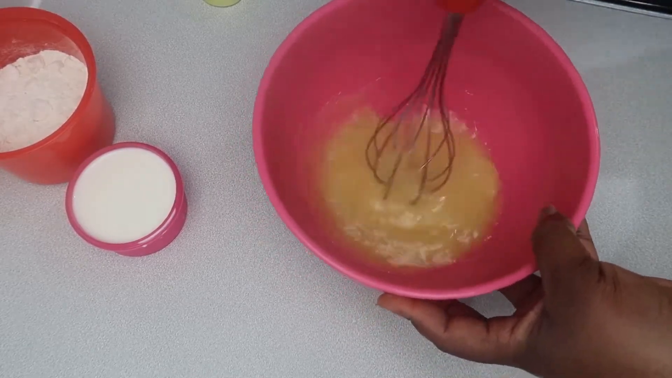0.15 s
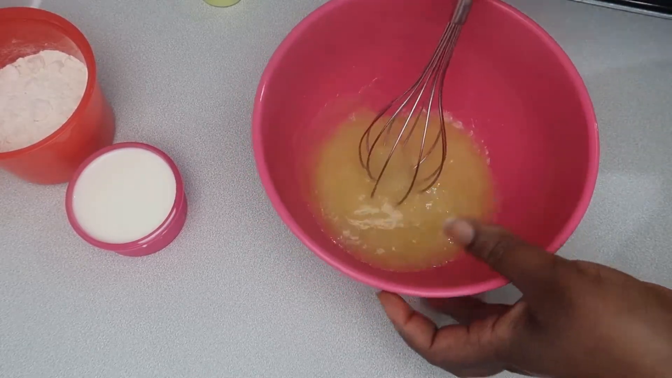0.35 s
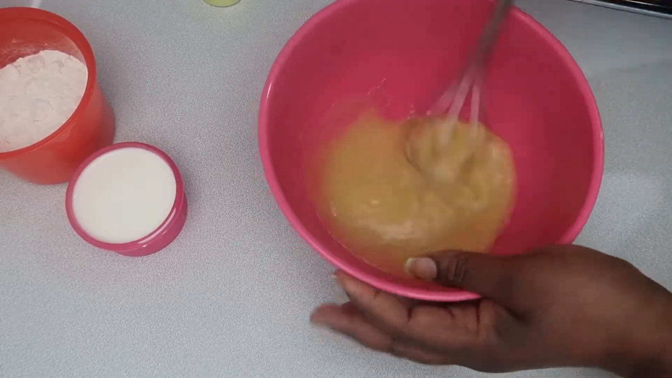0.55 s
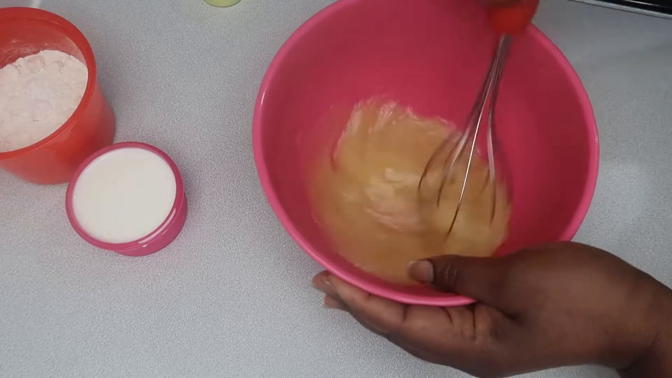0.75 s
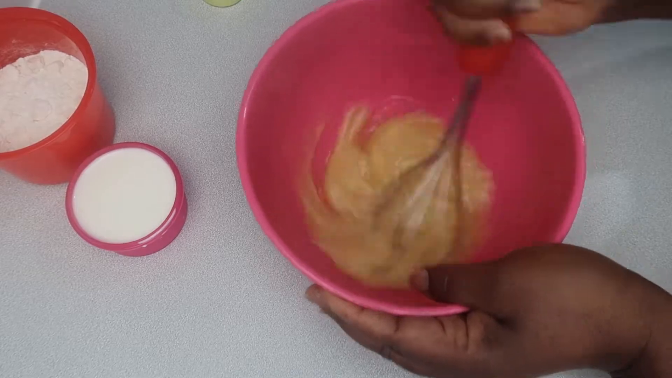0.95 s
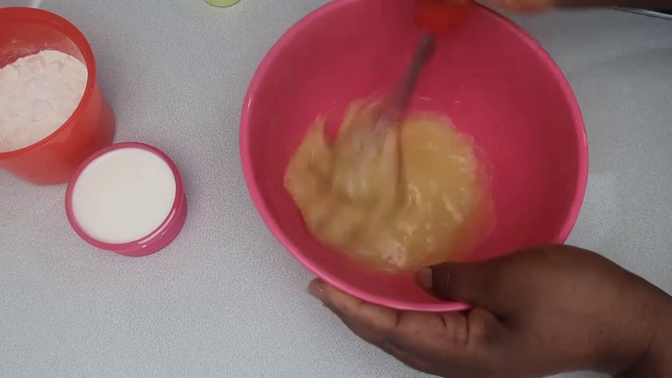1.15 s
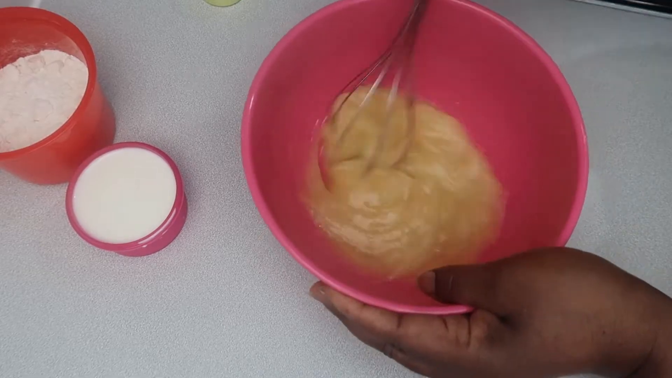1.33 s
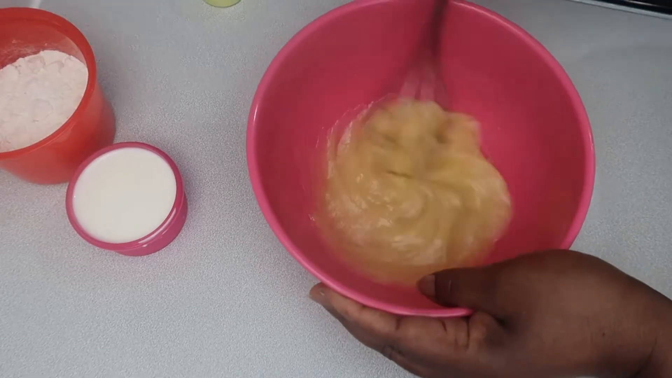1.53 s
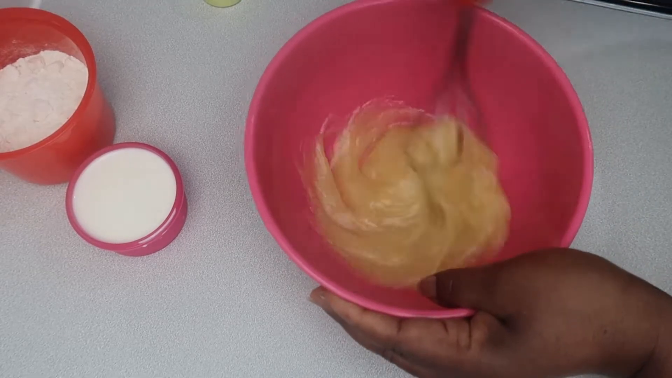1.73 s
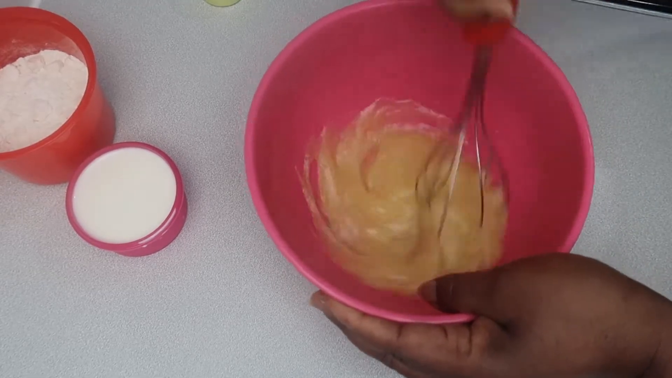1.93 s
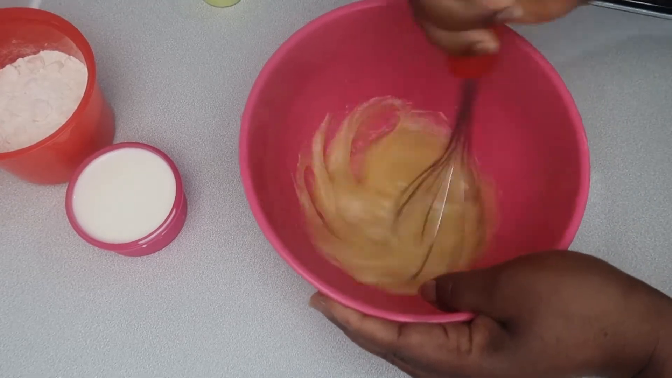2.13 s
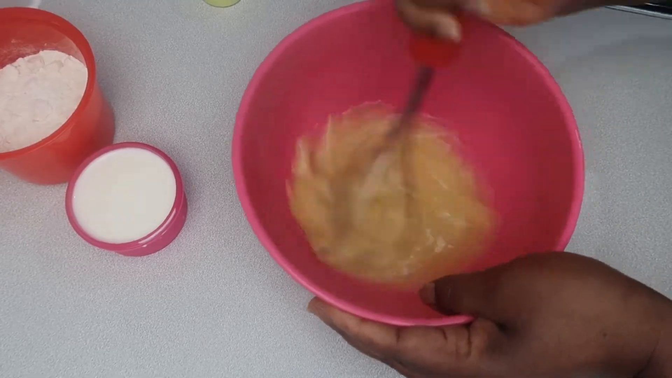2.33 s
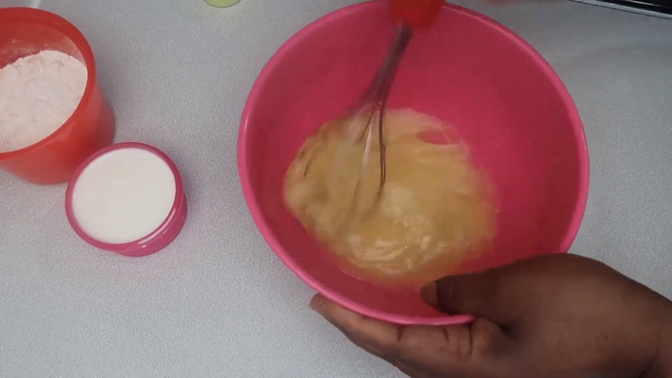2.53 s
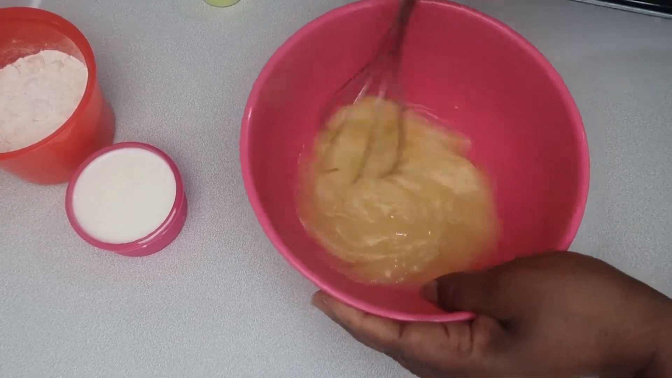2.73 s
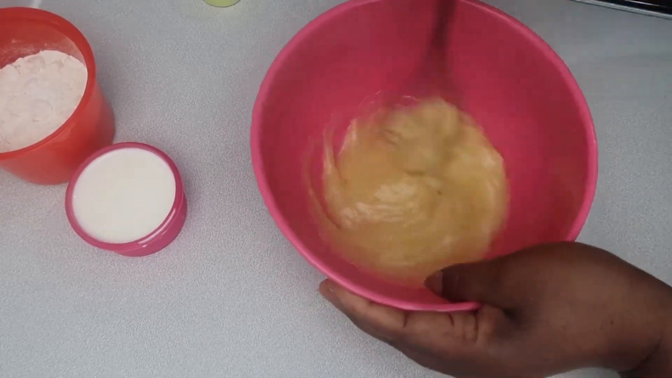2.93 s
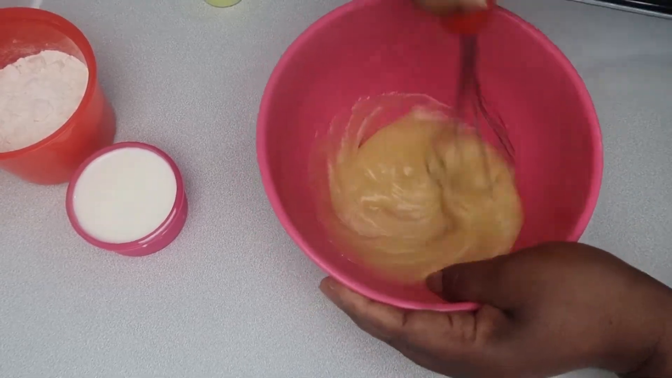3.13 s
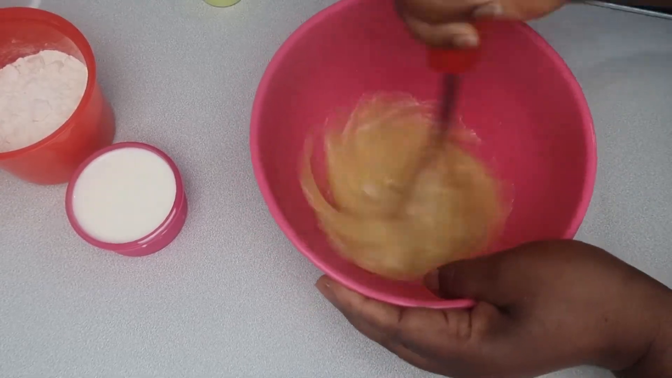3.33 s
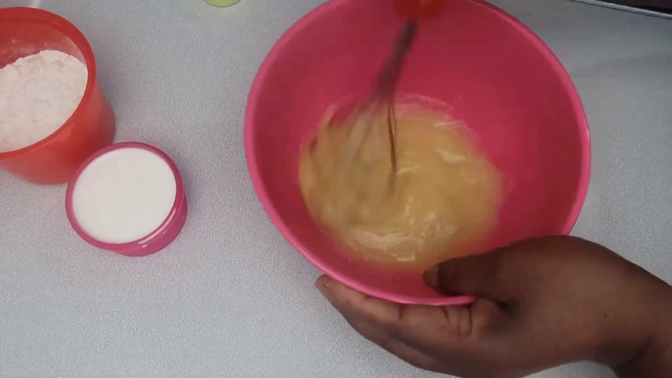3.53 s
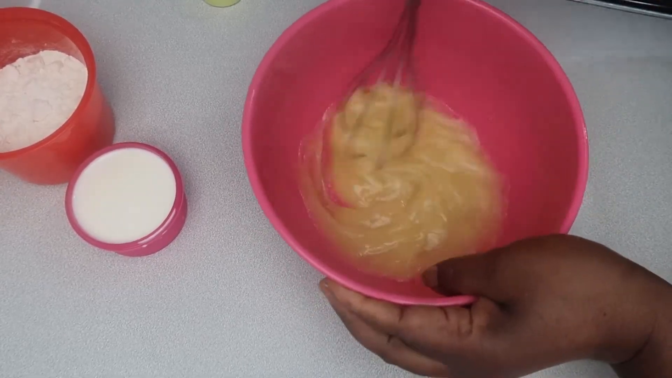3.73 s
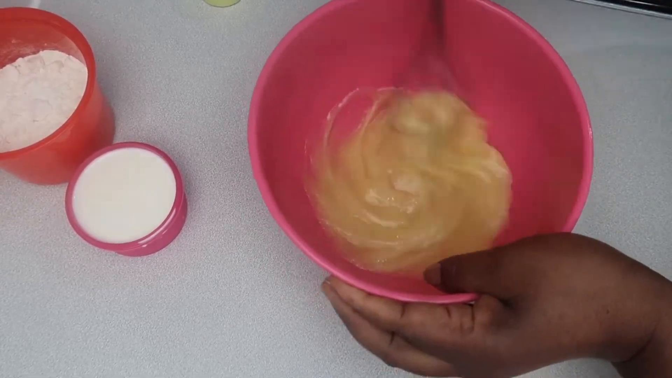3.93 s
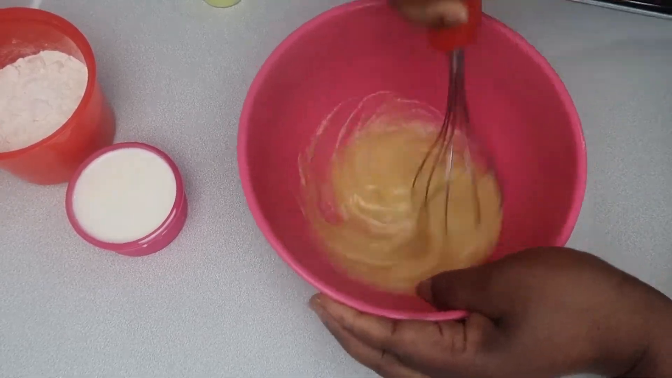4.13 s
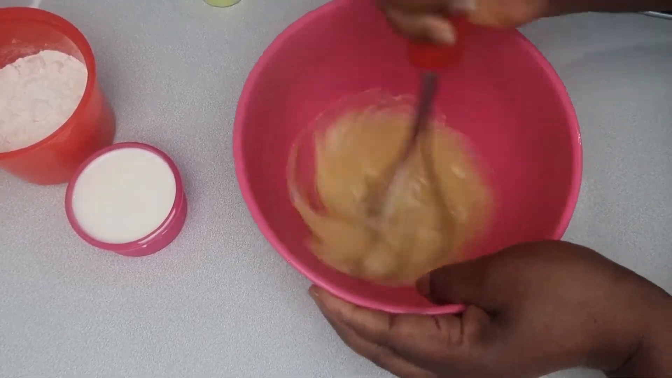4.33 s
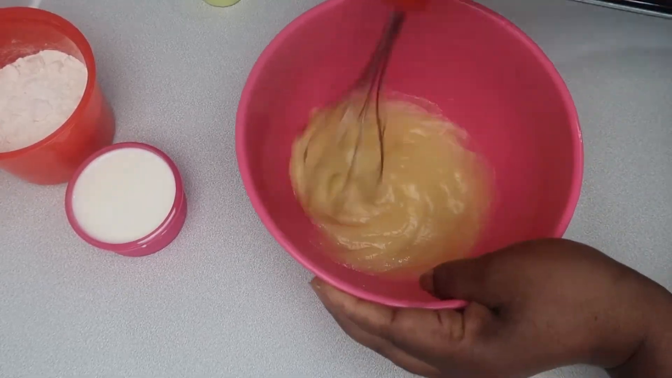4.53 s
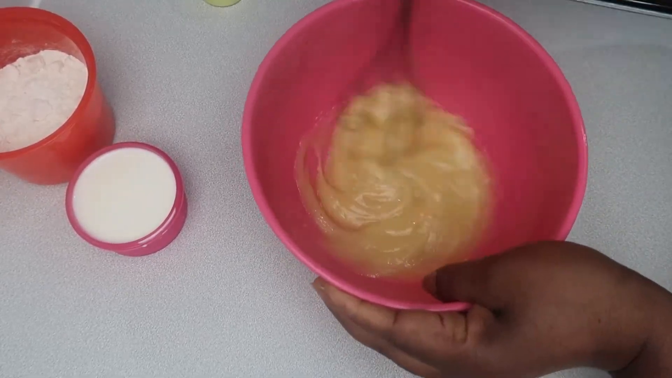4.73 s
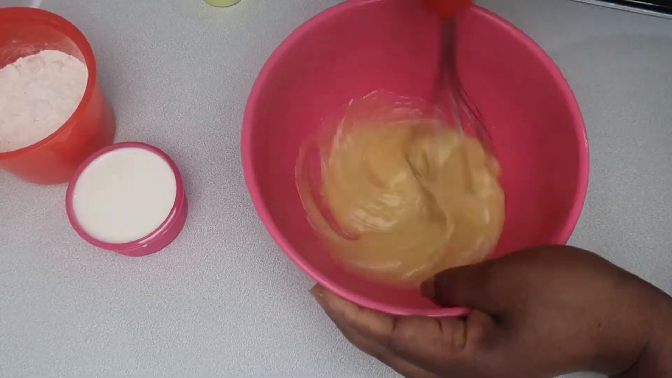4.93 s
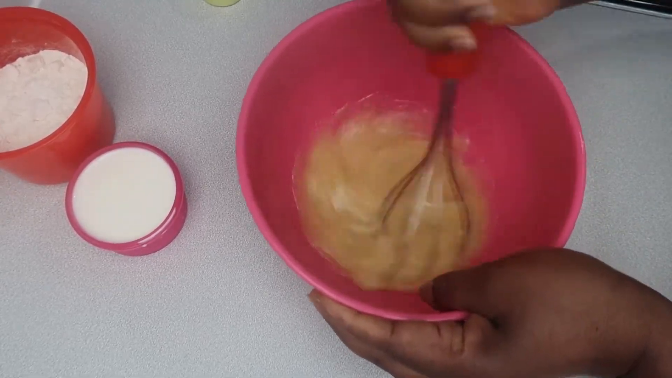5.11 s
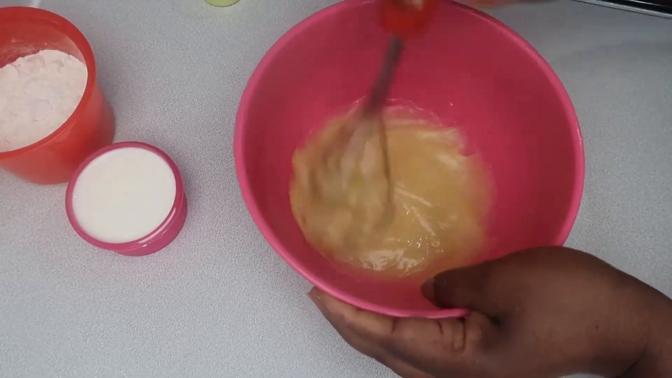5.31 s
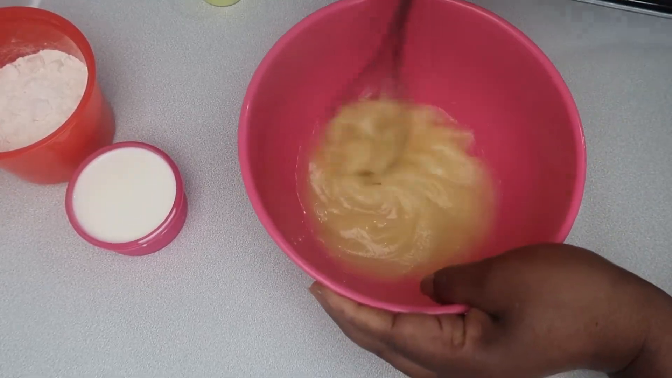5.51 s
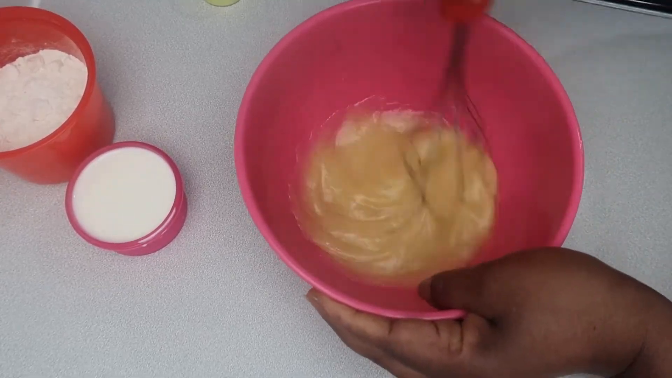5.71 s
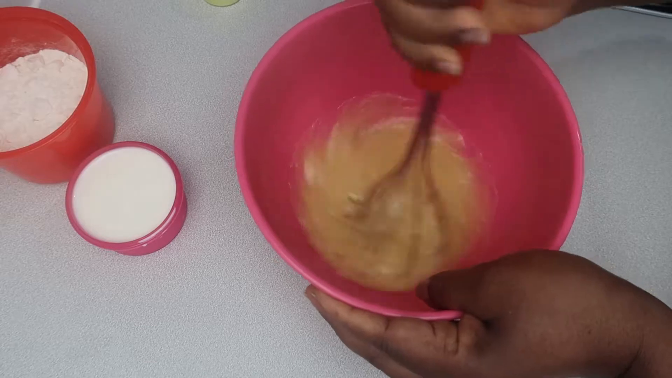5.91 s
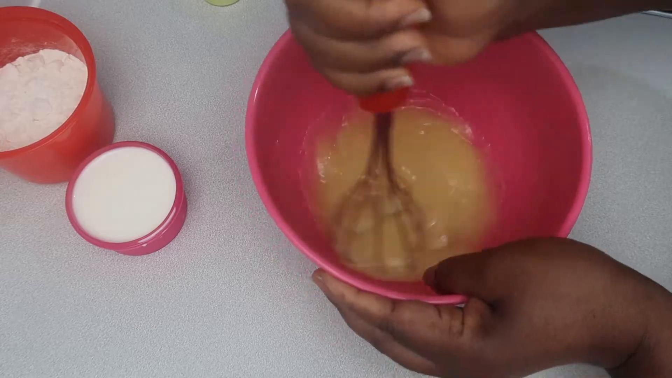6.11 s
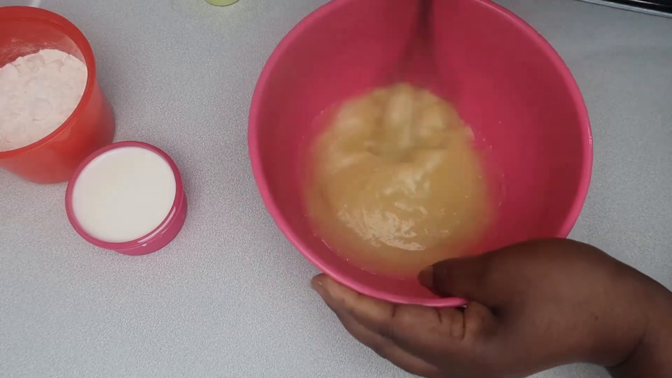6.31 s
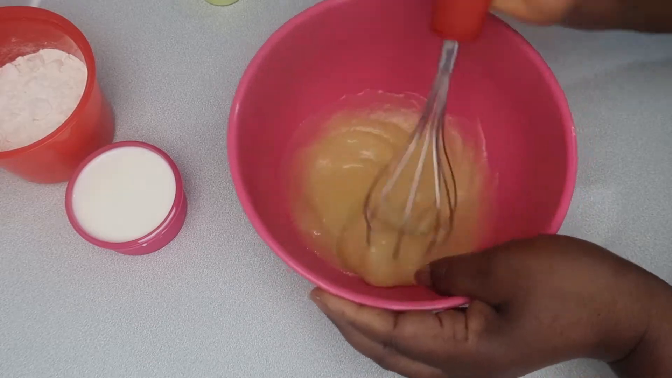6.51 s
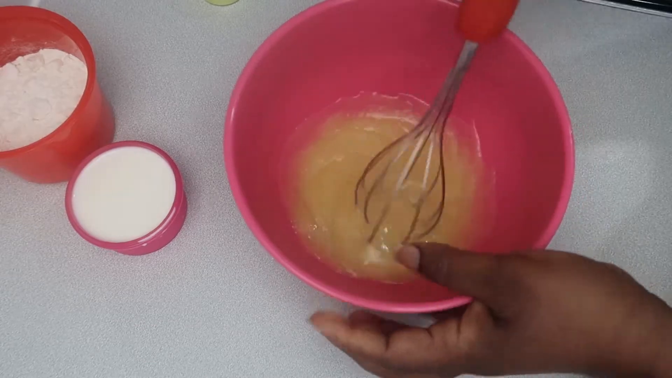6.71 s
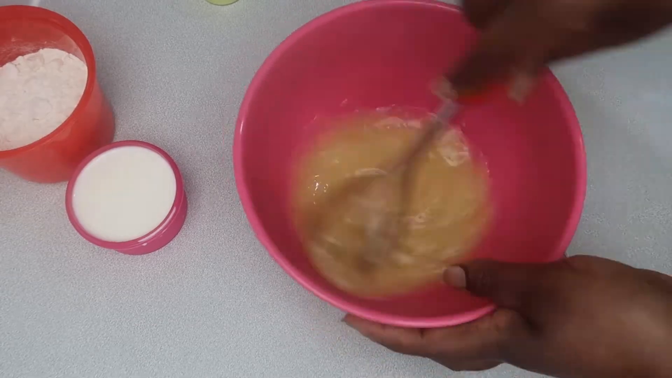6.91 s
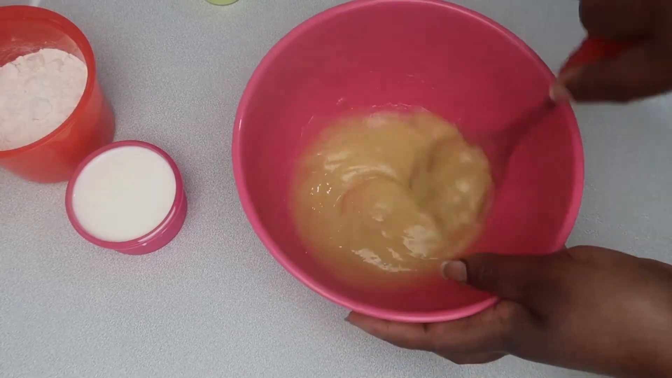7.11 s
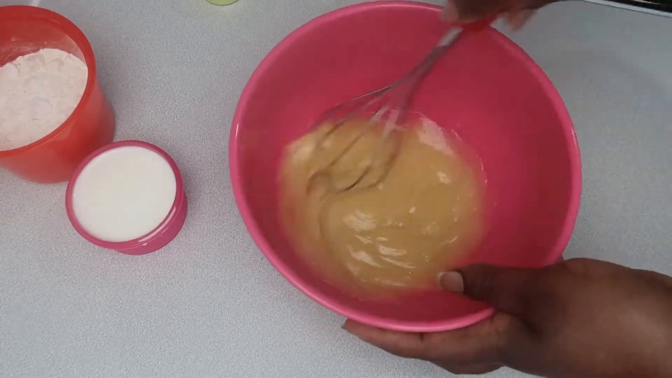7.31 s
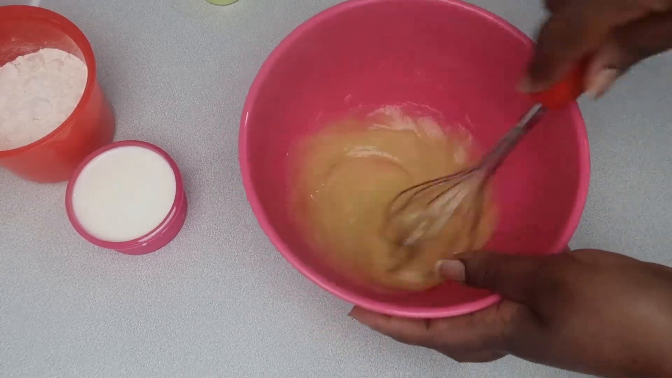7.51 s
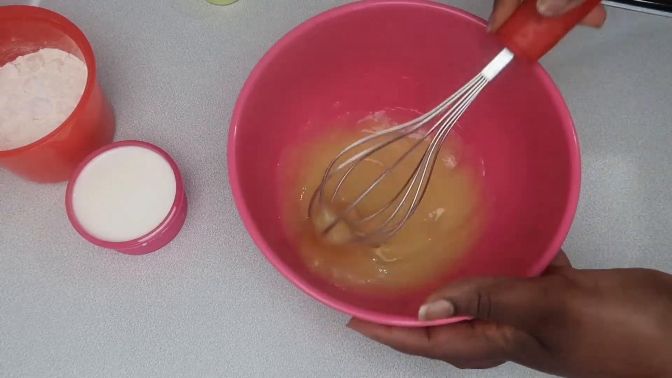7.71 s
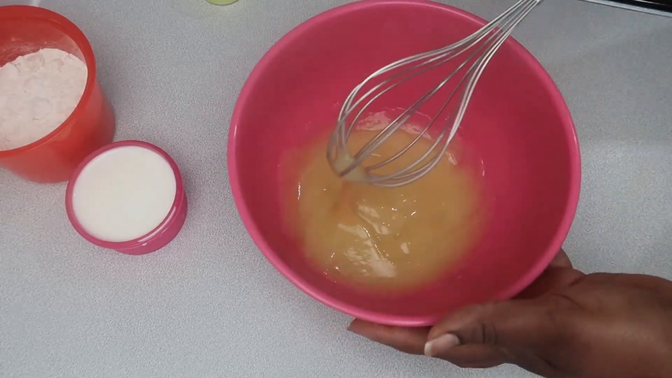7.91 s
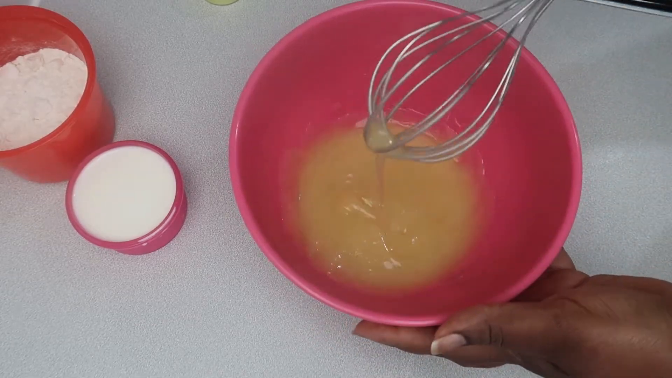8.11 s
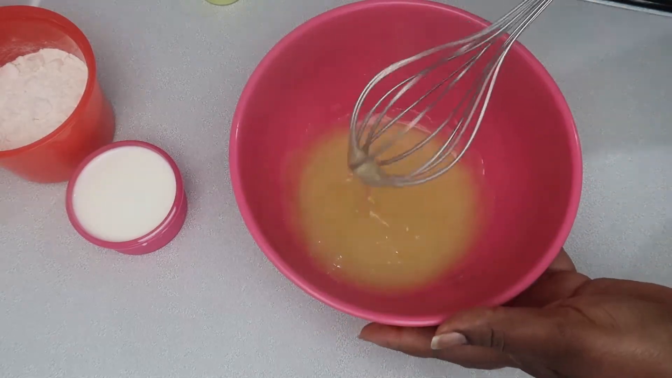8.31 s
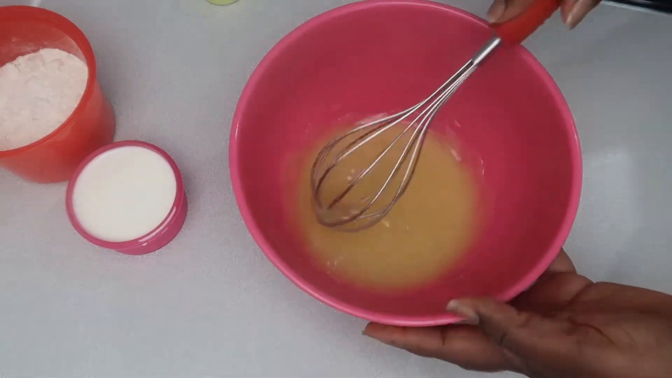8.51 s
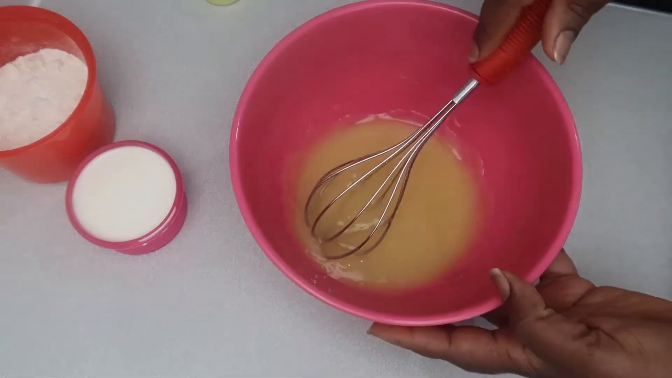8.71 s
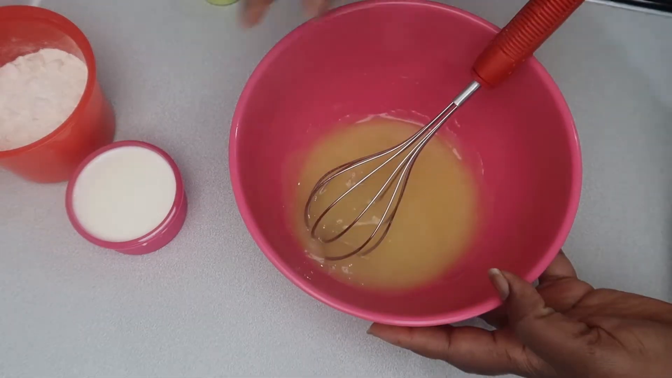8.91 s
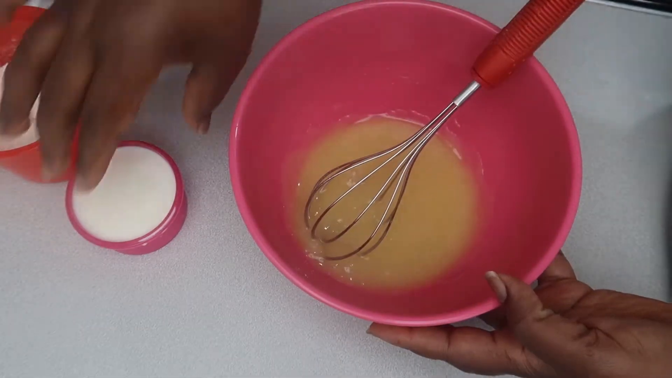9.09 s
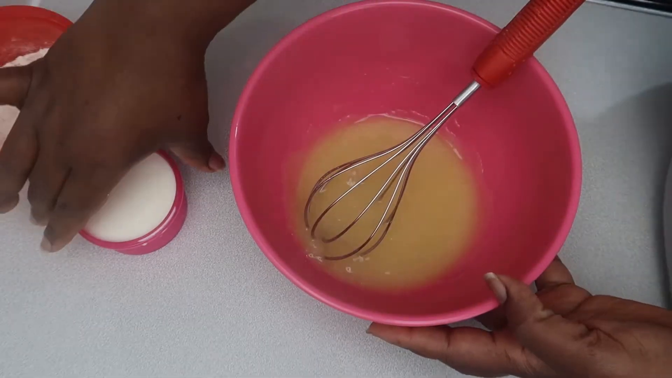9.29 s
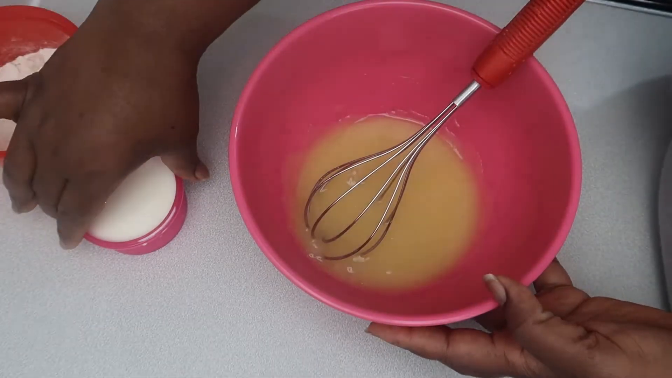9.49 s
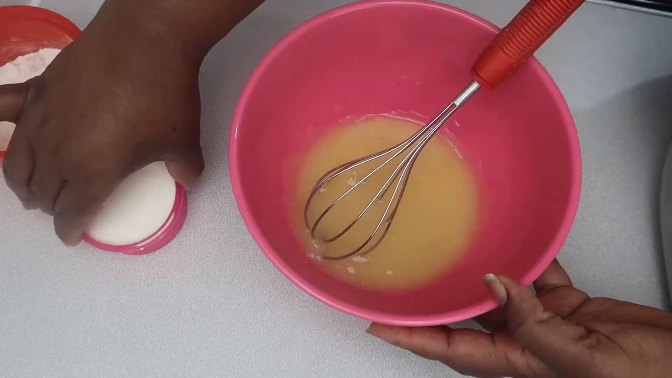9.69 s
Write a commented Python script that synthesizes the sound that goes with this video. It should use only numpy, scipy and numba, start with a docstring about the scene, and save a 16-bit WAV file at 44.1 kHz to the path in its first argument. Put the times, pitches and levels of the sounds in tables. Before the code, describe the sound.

Close, rapid whisking of runny batter clatters and squelches against hollow plastic, slows, stops, and ends with two or three rim taps and a knock over faint hum.

```python
"""Whisk in a plastic bowl

A wire whisk beats egg batter in a plastic bowl on a kitchen counter, heard from close by.
Wire slips and strikes ring decaying modes of wall, bowl air and counter; the bowl rocks on its foot.
Air pockets smack and plop as short swelling tones; batter fizz is noise gated by the slips.
Wavering hum and soft room noise run throughout and remain when the whisk rests."""
import sys
import numpy as np
from scipy import signal
from scipy.fft import rfft, irfft, next_fast_len
from scipy.io import wavfile
from scipy.ndimage import uniform_filter1d
from numba import njit

SR = 44100
rng = np.random.default_rng(int(sys.argv[2]) if len(sys.argv) > 2 else 0)


def put_to_file(sound):
    """Save the sound as 16-bit audio at rate SR, in the file named by the first command-line argument."""
    columns = np.atleast_2d(sound).T  # one column per channel
    safe = np.clip(columns, -1, 1)
    whole_steps = np.round(safe * 32767)
    wavfile.write(sys.argv[1], SR, whole_steps.astype(np.int16))


N = 429956
T = np.arange(N) / SR
BLOCK = 512  # samples between updates of mode pitch and contact spot

# drive of the dragging wires: (time [s], wall [dB], bowl air [dB], counter [dB])
DRAG_DRIVE = [(0, -30.5, -40, -49), (.045, -33, -49, -31), (.08, -29, -55, -23), (.2, -58, -70, -79),
              (.3, -65.5, -55, -61), (.62, -43, -38.5, -41), (.74, -31.5, -24, -31.5), (1, -28, -28, -30),
              (1.5, -26, -21, -35.5), (2.1, -23, -22.5, -28.5), (2.5, -27.5, -25, -34),
              (2.8, -27, -28, -30.5), (3.151, -31, -32.5, -32.5), (3.5, -29.5, -30.5, -36),
              (3.93, -27, -20, -31.5), (4.06, -31, -49, -66), (4.13, -23.5, -3.5, -14),
              (4.2, -25.5, -19, -29), (4.55, -33.5, -37.5, -39), (4.85, -35, -34, -39),
              (5.2, -32, -33, -35.5), (5.5, -32.5, -30, -37), (5.85, -31.5, -33.5, -40),
              (6.1, -42, -26.5, -29), (6.3, -33, -40.5, -53), (6.52, -36.5, -30.5, -39),
              (6.66, -64, -57.5, -49), (6.911, -55, -49, -46), (6.929, -34.5, -33, -30),
              (7.1, -38.5, -33.5, -38), (7.3, -38, -37, -35), (7.45, -33, -28.5, -41),
              (7.62, -39.5, -29.5, -39.5), (7.75, -65, -74, -63), (7.95, -81, -83, -56)]
# strikes: (time [s], blow on wall [dB], on bowl air [dB], on counter [dB], wall colour [Hz])
STRIKE_LIST = [(0.047, -45, -45, -45, 2760), (0.065, -15.5, -42, -35, 3030), (0.075, -35, -6.5, -24, 3100),
               (0.128, -25, -45, -35, 2920), (0.169, -37, -43, -53, 2100), (0.283, -28.5, -19.5, -26, 1890),
               (0.433, -34, -32, -28, 2090), (0.49, -34, -27, -42, 1500), (0.517, -48, -56, -50, 2300),
               (0.547, -34, -37, -49, 2260), (0.579, -47, -36, -49, 2010), (0.61, -55, -40, -50, 2580),
               (0.637, -38, -41, -34, 2300), (0.668, -20.5, -28, -42, 2460), (0.719, -22, -16, -21.5, 2240),
               (0.819, -15, -19.5, -20, 2420), (0.846, -35, -38, -40, 2430), (0.885, -12.5, -40, -48, 2070),
               (0.908, -30, -20, -27, 2400), (0.951, -20, -15.5, -15, 2300), (0.96, -26, -37, -29, 2240),
               (1.001, -46, -18, -37, 2250), (1.025, -11, -11.5, -17, 2490), (1.04, -27, -13, -35, 2750),
               (1.071, -40, -18, -46, 2390), (1.11, -17.5, -44, -40, 2820), (1.178, -81, -76.5, -18, 1980),
               (1.279, -14.5, -14, -13, 2250), (1.357, -25, -27, -38, 2440), (1.372, -18.5, -35, -27, 2480),
               (1.387, -10.5, -15.5, -26, 2450), (1.467, -52, -52, -49.5, 2360),
               (1.517, -13, -12.5, -9.5, 2120), (1.563, -28, -25, -23, 2850), (1.596, -12, -22, -28, 2240),
               (1.625, -11, -20, -23, 2320), (1.652, -27, -21, -36, 2280), (1.728, -28, -33, -22, 2340),
               (1.739, -18.5, -17, -26, 2320), (1.748, -18, -12, -11.5, 1980), (1.8, -13.5, -41, -23, 2550),
               (1.855, -13, -34, -45, 1930), (1.873, -15, -18.5, -23, 1680), (1.905, -32, -22, -42, 2140),
               (1.935, -30, -19, -51, 2090), (1.963, -14.5, -16, -11.5, 2560),
               (1.974, -26, -11.5, -14.5, 2410), (2.018, -29, -48, -50, 2800), (2.038, -34, -20, -56, 1900),
               (2.078, -11.5, -16.5, -18, 2440), (2.121, -26, -35, -40, 1630), (2.152, -21, -38, -40, 2340),
               (2.17, -40, -37, -31, 2300), (2.215, -11, -10.5, -10, 2090), (2.269, -18, -37, -40, 2640),
               (2.328, -39, -25, -35, 1700), (2.36, -20, -18, -21, 2430), (2.388, -32, -25, -44, 2330),
               (2.45, -11, -12, -8, 2040), (2.5, -20, -18, -43, 2880), (2.512, -13.5, -39, -38, 2800),
               (2.525, -33, -19, -34, 2800), (2.565, -33, -30, -32, 2400), (2.584, -42, -19, -41, 1900),
               (2.606, -18, -15.5, -14, 2800), (2.634, -19, -27, -40, 2360), (2.68, -11, -9.5, -10.5, 2090),
               (2.727, -13, -31, -40, 2810), (2.761, -43, -18.5, -38, 2600), (2.788, -14.5, -26, -33, 3000),
               (2.81, -19, -19, -42, 2380), (2.832, -21, -27, -41, 4560), (2.862, -26, -31, -38, 2530),
               (2.887, -47, -28, -44, 2400), (2.927, -16, -14.5, -15, 1780), (2.977, -21, -23, -21, 3220),
               (2.988, -14.5, -21, -29, 2920), (3.012, -35, -21, -31, 2500), (3.029, -10, -20, -18, 2630),
               (3.069, -20, -17, -16, 1790), (3.088, -39, -27, -40, 2400), (3.129, -43, -44, -49, 2090),
               (3.154, -16, -19.5, -40, 1980), (3.192, -20, -44, -63, 2430), (3.212, -16.5, -19, -53, 2230),
               (3.228, -16, -22, -46, 2970), (3.258, -33, -35, -44, 3180), (3.276, -26, -35, -31, 3040),
               (3.319, -23, -27, -27, 2080), (3.389, -36, -31, -37, 2300), (3.428, -15, -17.5, -20.5, 1940),
               (3.465, -15, -17, -37, 2460), (3.518, -23, -27, -44, 2900), (3.568, -44, -26, -25, 2580),
               (3.6, -38, -30, -37, 4790), (3.622, -33, -36, -33, 2390), (3.659, -19.5, -40, -43, 2130),
               (3.671, -31, -14, -19.5, 2100), (3.731, -19, -24, -45, 2780),
               (3.785, -22.5, -10.5, -15, 2440), (3.829, -35, -38, -39, 2170), (3.86, -18, -24, -26, 2130),
               (3.871, -20.5, -28, -40, 2630), (3.898, -38, -16.5, -23, 2470), (3.918, -38, -22, -32, 1400),
               (3.963, -21, -25.5, -23.5, 2920), (4.027, -16.5, -67, -78, 2170),
               (4.054, -25, -34, -38, 3270), (4.087, -14.5, -28, -48, 2400), (4.1, -7.5, 3, -5.5, 1680),
               (4.103, -25, 5, -17.5, 2770), (4.234, -14, -19, -52, 2750), (4.287, -23, -42, -53, 2500),
               (4.299, -33, -9.5, -28, 2180), (4.417, -27, -17.5, -33, 2260), (4.482, -35, -27, -45, 3000),
               (4.546, -27, -43, -47, 2620), (4.58, -28, -44, -43, 2500), (4.589, -41, -14.5, -17.5, 2310),
               (4.606, -37, -32, -45, 2670), (4.637, -26, -28, -27, 2700), (4.683, -21, -18.5, -49, 2270),
               (4.753, -19.5, -21.5, -52, 2660), (4.798, -37, -52, -50, 3000), (4.825, -24, -29, -53, 2070),
               (4.863, -28, -27, -24, 2410), (4.884, -40, -36, -39, 2400), (4.935, -20, -24, -24, 2130),
               (4.989, -37, -29, -43, 1400), (5.013, -16, -23, -31, 3160), (5.081, -36, -25, -41, 2440),
               (5.138, -20, -24, -23, 2230), (5.184, -26, -35, -42, 2100), (5.195, -35, -20.5, -24.5, 1870),
               (5.248, -20.5, -32, -45, 2420), (5.271, -21, -36, -31, 2700), (5.319, -22, -44, -29, 2550),
               (5.371, -36, -35, -47, 3040), (5.401, -62, -25, -36, 2210), (5.435, -23, -27, -30, 2720),
               (5.523, -18, -29, -44, 2050), (5.593, -28, -22.5, -44, 2370), (5.63, -22, -28, -29, 2050),
               (5.696, -26, -28, -20.5, 1580), (5.721, -23.5, -30, -41, 2380), (5.794, -21, -37, -48, 2180),
               (5.807, -26, -18, -27, 2280), (5.864, -20, -35, -42, 2500), (5.895, -23, -25.5, -42, 2370),
               (6.002, -23.5, -45, -45, 2440), (6.161, -19.5, -34, -47, 2770), (6.216, -50, -45, -50, 1600),
               (6.252, -25, -29, -33.5, 1960), (6.339, -45, -42, -48, 3140), (6.37, -18, -5.5, -13, 1450),
               (6.446, -27, -50, -44, 2140), (6.499, -24.5, -50, -39, 1900),
               (6.702, -23.5, -20, -17.5, 3450), (6.775, -38, -43, -39, 2250), (6.812, -40, -36, -46, 1790),
               (6.923, -30, -29.5, -31, 2190), (7.023, -32, -20, -24.5, 1710), (7.059, -37, -42, -51, 2350),
               (7.105, -30, -42, -49, 1430), (7.125, -21.5, -40, -49, 2320),
               (7.144, -24, -9.5, -14.5, 1590), (7.219, -23, -46, -44, 2680), (7.255, -34, -49, -45, 3050),
               (7.271, -24.5, -43, -35, 1950), (7.291, -33, -37, -45, 3700), (7.323, -33, -20.5, -19, 2900),
               (7.387, -32, -49, -49, 2450), (7.406, -23, -43, -41, 2800), (7.414, -19, -21.5, -21, 2410),
               (7.436, -16.5, -37, -45, 2580), (7.447, -22.5, -40, -43, 2500), (7.525, -28, -48, -29, 1880),
               (7.573, -24, -43, -44, 1770), (7.631, -51, -23.5, -49, 1710),
               (7.644, -50, -23.5, -29.5, 1720), (8.726, -42, -32, -36, 2400),
               (8.765, -35, -32.5, -47.5, 3240), (8.792, -16.5, -5.5, -10.5, 2910),
               (8.816, -27, -9, -35, 2500), (8.829, -31, -20, -31.5, 1400), (8.853, -35, -31, -26, 1340),
               (8.928, -59, -40, -57, 1270)]
# whisk turns, wires easing off just before: (time [s], dip [dB], negative = rise)
WHISK_TURNS = [(0.818, 7), (1.28, 7.5), (1.387, 10), (1.515, 3.5), (1.741, 9), (1.854, 4.5), (1.963, 5.5),
               (2.213, 9), (2.327, 5.5), (2.447, 4.5), (2.584, 9), (2.606, 1), (2.68, 1), (2.926, 2.5),
               (3.154, -3), (3.426, 0), (3.67, 8.5), (3.786, 5.5), (3.893, 16.5), (4.102, 7.5),
               (4.589, 0.5), (4.864, 2), (5.08, 9), (5.32, 9), (5.63, 3), (5.807, 7.5), (6.161, 10),
               (6.37, 0), (7.144, 2.5), (7.415, 9)]
# clear plops, air slapped shut between wire, batter and wall: (time of peak [s], level [dB], pitch [Hz])
CLEAR_PLOPS = [(0.0735, -19, 2863), (0.1294, -20.9, 3000), (0.8213, -27, 2340), (1.0304, -12, 2863),
               (1.0707, -19, 4543), (1.2869, -19, 2390), (1.5184, -19, 4500), (1.5976, -18, 5749),
               (1.6263, -3.5, 2360), (1.8743, -13, 1593), (1.8922, -19, 5620), (1.9688, -21, 7170),
               (1.9738, -16, 4629), (2.2159, -11.5, 4543), (2.4499, -17.5, 4600), (2.5834, -19, 4440),
               (2.6089, -25, 2497), (2.6793, -20.2, 4242), (2.8334, -12, 4608), (3.0367, -10, 2605),
               (3.1641, -16, 4640), (3.2297, -9, 2880), (3.2774, -25.4, 7084), (3.3244, -16, 2100),
               (3.4749, -20, 5792), (3.6011, -18, 4860), (3.6256, -18.5, 2411), (3.67, -20.0, 4672),
               (4.0275, -18, 4931), (4.2363, -24, 2799), (4.581, -20, 2530), (4.685, -18, 2476),
               (4.8015, -18, 3100), (5.015, -20, 2880), (5.0835, -16.5, 2510), (5.1404, -27, 4026),
               (5.2725, -21, 2842), (5.3719, -26, 4770), (5.5968, -25.4, 3165), (5.7, -23, 1650),
               (5.8079, -17, 2480), (6.4475, -25, 2174), (6.703, -27, 3300), (7.0608, -23.5, 2400),
               (7.2223, -26.5, 2648), (7.3299, -22, 3208)]
# pushes of the rocking foot on the deepest counter mode: (time [s], push [dB])
FOOT_ROCKS = [(0.439, -29), (0.73, -28.5), (0.958, -19.5), (1.192, -33), (1.442, -18.5), (1.666, -23),
              (1.887, -23), (2.14, -20.5), (2.372, -24), (2.607, -24), (2.837, -22.5), (3.063, -30.5),
              (3.217, -24.5), (3.448, -33), (3.619, -27), (3.914, -21), (4.101, -20), (4.354, -20.5),
              (4.62, -36), (4.875, -26.5), (5.162, -21.5), (5.378, -28), (5.629, -27.5), (5.976, -29),
              (6.371, -37), (7.146, -27), (7.298, -30), (7.418, -47), (8.795, -21.5), (8.824, -28),
              (8.857, -34)]
# modes of each body: (frequency [Hz], relative level [dB])
COUNTER_MODES = [(142, 2), (184, 0.5), (225, -5), (290, -12), (329, -3)]
AIR_MODES = [(395, -15), (465, -7.5), (570, -12.5), (615, 1), (660, 6.5), (710, -4.5), (770, -10.5),
             (895, -9), (997, -28)]
WALL_MODES = [(1163, 7.5), (1365, 6.5), (1600, 1), (1820, -2.5), (2100, 3.5), (2390, 8.5), (2600, 8.5),
              (2850, 7), (3150, 7.5), (3450, -2.5), (3800, 2.5), (4150, -1), (4600, 0), (5100, -7),
              (5700, -4.5), (6400, -12.5)]
# 60 dB decay of each counter mode: (duration [cycles])
COUNTER_DECAY_CYCLES = np.array([51, 24.5, 22, 23.9, 31.0])
# noise spectra of batter fizz, counter shaking and room: (frequency [Hz], relative level [dB])
FIZZ_SPECTRUM = [(2500, -5), (4000, -2), (5000, -9), (7000, -11), (10000, -18.5), (12500, -24),
                 (14000, -29), (15500, -43)]
THUMP_SPECTRUM = [(12, -27), (22, -8), (48, 24), (75, -28), (100, -13), (130, -4)]
ROOM_SPECTRUM = [(20, -18), (50, -4.5), (100, -7.5), (146, 0), (220, -9), (300, -5), (450, -11.5),
                 (650, -18.5), (1000, -20.5), (2000, -28), (4200, -32.5), (6500, -39.5), (10000, -45),
                 (15000, -56)]
# hum tones: (centre frequency [Hz], mean level [dB])
HUM_TONES = [(70, -76), (145.3, -53.5), (215.3, -60), (457.6, -82), (640.6, -67)]
# edges of the fizz bands that flare on their own: (frequency [Hz])
FIZZ_BAND_EDGES_HZ = [3350, 5320, 8460, 12050]

STRIKE_S, WALL_BLOW_DB, AIR_BLOW_DB, COUNTER_BLOW_DB, STRIKE_HZ = np.transpose(STRIKE_LIST)
AIR_CYCLES, WALL_CYCLES, RATTLE_CYCLES = 39, 47.2, 14  # 60 dB decay; lying wires damp the rattle
# drag on the wall relative to brisk whisking
BRISK_DB = -35
PACE_DB = np.interp(STRIKE_S, *np.transpose(DRAG_DRIVE)[:2]) - BRISK_DB
# skid after a strike: level against the blow, time to ease off
WALL_SKID_DB, AIR_SKID_DB, COUNTER_SKID_DB = -0.87, -7, -8.5
WALL_SKID_S, AIR_SKID_S, COUNTER_SKID_S = 0.0046, 0.011, 0.013
SKID_RISE_S, EASE_S, ROCK_PUSH_S = 0.0012, 0.043, 0.0041
DRY_SKID_SHARE = 0.16  # dB of skid per dB of pace
DRAG_TRIM_DB = -1  # overall level of the clumpy drag on wall and bowl air
# batter clumps between wire and wall
WALL_CLUMP_DB, AIR_CLUMP_DB, CLUMPS_PER_S = 2, 2.5, 35
# a wet blow: pitched smack plus dry tick, softer in fast batter
SMACK_DB, TICK_DB, CUSHION_SHARE = -5, -7, 0.21
# hard blows on the bowl leave the wires rattling, more so in a moving whisk
RATTLE_DB, RATTLE_S, RATTLE_PACE_SHARE = -20, 0.035, 0.079
# mode colour: dragging wakes modes more evenly; a blow depends less on the spot
DRAG_COLOUR_SHARE, BLOW_SPOT_SHARE, SPOT_STEPS, WALL_SPOT_DB = 0.5, 0.37, 3, 3.5
AIR_NOTE_HZ, AIR_NOTE_SPREAD = 657, 0.028  # spread in natural log of frequency
# fizz drive against the wall's; growth is an exponent on the drag
FIZZ_DRAG_DB, FIZZ_STRIKE_DB, FIZZ_BURST_S, FIZZ_GROWTH = -12, -19.5, 0.0031, 1.32
WET_SHARE, BRIGHT_FIZZ_DB = 0.3, 9.5  # dB per dB of pace; dB per octave of wall colour
SPLASH_DB, SPLASHES_PER_S = 3.5, 45
PLOP_RISE_CYCLES, PLOP_SAG = 2.265, 0.0026  # sag: fraction of phase lost per cycle run, up to 20
THUD_DB, THUD_HZ, THUMP_DB, BUBBLE_DB = 25.5, 169, -17, -6
FEET_HZ, TOP_HZ, ROOM_DB = 108, 15500, -50
DULL_T60_S, BRIGHT_T60_S = .25, .32


def undb(db):
    """Decibels to amplitude."""
    return 10 ** (np.asarray(db) / 20)


def unit(x):
    """Scale to RMS 1."""
    return x / np.sqrt(np.mean(x ** 2))


def colour(x, points):
    """Shape a spectrum by (frequency [Hz], level [dB]) points, straight on a log axis."""
    hz, db = np.transpose(points)
    size = next_fast_len(N)
    f = np.maximum(np.arange(size // 2 + 1) * SR / size, 1)
    gain = undb(np.interp(np.log(f), np.log(hz), db))
    return irfft(rfft(x, size) * gain, size)[..., :N]


def walk(rate):
    """Random levels held 1 / rate s, then smoothed twice."""
    k = int(SR / rate)
    held = np.repeat(rng.standard_normal(N // k + 1), k)
    return 0.99 * uniform_filter1d(uniform_filter1d(held, k), k)[:N]


def high_pass(x, hz, order=1):
    """Butterworth low cut."""
    return signal.sosfilt(signal.butter(order, hz, "high", fs=SR, output="sos"), x)


def low_pass(x, hz, order=2):
    """Butterworth high cut."""
    return signal.sosfilt(signal.butter(order, hz, fs=SR, output="sos"), x)


def hum():
    """Wavering low tones over soft room noise; the bass is the same left and right."""
    tones = 0
    for hz, db in HUM_TONES:
        level = np.sqrt(2) * undb(db + 1.2 * walk(18))
        pitch_hz = hz * (1 + 0.00954 * walk(5.3))
        tones = tones + level * np.sin(2 * np.pi * np.cumsum(pitch_hz) / SR)
    mid, side = colour(rng.standard_normal((2, N)), ROOM_SPECTRUM)
    scale = undb(ROOM_DB) * undb(.8 * walk(5)) / np.std(mid)
    return tones + scale * mid, scale * high_pass(side, 1400.0) * undb(3.0)


def slips(per_s, scatter_db):
    """Stick-slip of wire on plastic: random ticks, a few much larger, coming in bunches."""
    busy = undb(1.92 * walk(60) + 2.0 * walk(200))
    sign = rng.choice([-1, 1], N)
    ticks = (rng.random(N) < per_s / SR) * sign * undb(scatter_db * rng.exponential(size=N))
    return unit(ticks * busy)


def easing():
    """The drag sinks towards each turn and is back at once after it (dB)."""
    when, dip_db = np.transpose(WHISK_TURNS)
    ahead = np.minimum(np.searchsorted(when, T), len(when) - 1)
    return -dip_db[ahead] * np.exp(-np.abs(when[ahead] - T) / EASE_S) * (T <= when[-1])


def drag():
    """Drag amplitude on wall, bowl air and counter; batter clumps unsettle the first two."""
    s, *columns = np.transpose(DRAG_DRIVE)
    wall, air, counter = (undb(np.interp(T, s, db) + easing()) * (T < s[-1]) for db in columns)
    wall = wall * undb(DRAG_TRIM_DB + WALL_CLUMP_DB * walk(CLUMPS_PER_S))
    air = air * undb(DRAG_TRIM_DB + AIR_CLUMP_DB * walk(CLUMPS_PER_S))
    return wall, air, counter


@njit
def ring(push, pole):
    """One decaying mode, a complex one-pole whose pitch is renewed every 512 samples."""
    out, z = np.empty(len(push)), 0j
    for i in range(len(push)):
        z = z * pole[i >> 9] + push[i] + 1e-18
        out[i] = z.imag
    return out


def body(modes, cycles, rub, hit, spot_db, tint_db=None, together=True, drift=0.035):
    """Modes that die in set cycles and drift in pitch; each contact spot wakes them in its own proportion."""
    hz, db = np.transpose(modes)
    fade = np.exp(-np.log(1000) * hz / cycles / SR)
    steps = N // BLOCK + 1
    held = np.repeat(rng.standard_normal((steps, 2, len(hz))), SPOT_STEPS, axis=0)[:steps]
    spot, shift = uniform_filter1d(held.T, size=SPOT_STEPS).transpose(1, 0, 2)
    spot = 1.17 * spot_db * spot
    own = db[:, None] + (0 if tint_db is None else tint_db(hz[:, None]))

    def share(level_db):
        return undb(level_db) / np.sqrt(np.sum(undb(level_db) ** 2, axis=0))

    rubbed = share(DRAG_COLOUR_SHARE * own + spot)
    struck = share(own + BLOW_SPOT_SHARE * spot)
    out = 0
    for k in range(len(hz)):
        # dragging pulls neighbours against each other; a direct blow can start all together
        flip = (-1) ** k
        push = np.repeat(rubbed[k], BLOCK)[:N] * flip * rub * np.sqrt(2 * (1 - fade[k] ** 2))
        push = push + np.repeat(struck[k], BLOCK)[:N] * (1 if together else flip) * hit
        pole = fade[k] * np.exp(2j * np.pi * hz[k] * (1 + drift * shift[k]) / SR)
        out = out + ring(push, pole)
    return out


def at_strikes(size, late_s=0):
    """Impulses at the strike times."""
    out = np.zeros(N)
    np.add.at(out, ((STRIKE_S[:, None] + late_s) * SR).astype(int), size)
    return out


def blows(db, spread_s, count):
    """A strike: the first wire lands hard, the others follow within a few ms."""
    chance = rng.random((len(db), count, 2))
    follow = np.arange(count) > 0
    late_s = chance[..., 0] * spread_s * follow
    size = np.where(follow, 1.47 * (chance[..., 1] - .5), 1)
    return at_strikes(size * undb(db)[:, None], late_s)


def skids(db, skid_s):
    """After each strike the wires press home quickly and ease off."""
    rise = np.exp(-1 / (SKID_RISE_S * SR))
    pressed = signal.lfilter([1 - rise], [1, -rise], at_strikes(undb(db)[:, None]))
    return signal.lfilter([1], [1, -np.exp(-1 / (skid_s * SR))], pressed)


def last_strike():
    """Index of the latest strike, per block."""
    return np.maximum(np.searchsorted(STRIKE_S, T[::BLOCK] + BLOCK / SR) - 1, 0)


def rocks():
    """Soft pushes of the bowl's foot, a few ms long, ring the counter's deepest mode."""
    when, db = np.transpose(FOOT_ROCKS)
    push = np.zeros(N)
    push[(when * SR).astype(int)] = undb(db)
    soft = np.hanning(int(ROCK_PUSH_S * SR))
    push = np.convolve(push, 2 * soft / soft.sum())[:N]
    return body(COUNTER_MODES[:1], COUNTER_DECAY_CYCLES[:1], 0, push, spot_db=0, drift=0)


def counter_top(slip, drag_level):
    """Counter modes under drag, blows and rocking, plus thuds of the bowl and shaking noise."""
    pressure = drag_level + skids(COUNTER_BLOW_DB + COUNTER_SKID_DB, COUNTER_SKID_S)
    hit = blows(COUNTER_BLOW_DB, 0.0066, count=3)
    low = body(COUNTER_MODES, COUNTER_DECAY_CYCLES, slip * pressure, hit, spot_db=3.5,
               tint_db=lambda hz: -3.0 * np.abs(np.log2(hz / 195)), together=False, drift=0.0097)
    low = high_pass(low + rocks(), FEET_HZ, order=2)
    # a knock on the bowl also jolts the counter
    jolt = low_pass(at_strikes(undb(AIR_BLOW_DB)[:, None]), THUD_HZ)
    low = low + undb(THUD_DB) * high_pass(jolt, 65.0, order=2)
    shaking = unit(colour(rng.standard_normal(N), THUMP_SPECTRUM))
    low = low + undb(THUMP_DB) * shaking * uniform_filter1d(pressure, 2048)
    return low_pass(low, 1000.0)  # batter cushions the contact


def bowl_air(slip, drag_level):
    """Air modes of the bowl; the favoured note differs a little from strike to strike."""
    note_hz = AIR_NOTE_HZ * np.exp(AIR_NOTE_SPREAD * rng.standard_normal(len(STRIKE_S)))
    last = last_strike()
    rub = slip * (drag_level + skids(AIR_BLOW_DB + AIR_SKID_DB, AIR_SKID_S))
    boom = body(AIR_MODES, AIR_CYCLES, rub, blows(AIR_BLOW_DB, 0.005124, count=4), spot_db=3.5,
                tint_db=lambda hz: -9.0 * np.abs(np.log2(hz / note_hz[last])), drift=0.034)
    return high_pass(low_pass(boom, 1330.0), 290.0, order=2)


def plops(peak_s, gain, hz):
    """Short tones of closing air pockets that swell over a few cycles, sag a little and die."""
    length = 768
    turns = hz[:, None] * np.arange(length) / SR
    rise = turns / PLOP_RISE_CYCLES
    phase = turns * (1 - PLOP_SAG * np.minimum(turns, 20)) + rng.random((len(hz), 1))
    tone = gain[:, None] * rise * np.exp(1 - rise) * np.sin(2 * np.pi * phase)
    start = ((peak_s - PLOP_RISE_CYCLES / hz) * SR).astype(int)
    out = np.zeros(N + length)
    np.add.at(out, np.clip(start, 0, N)[:, None] + np.arange(length), tone)
    return out[:N]


def bubbles(count=9000):
    """Tiny air pockets folded into the batter close densely at all pitches; RMS 1."""
    when, pitch, size = rng.random((count, 3)).T
    hz = 1400 * 5.5 ** pitch
    return unit(plops(when * N / SR, np.log(1 - size) * (2400 / hz) ** 0.5, hz))


def bowl_wall(slip, drag_level):
    """Wall modes tinted by the last strike's place, wire rattle, and air smacks, plops and bubbles."""
    last = last_strike()
    rub = slip * (drag_level + skids(WALL_BLOW_DB + WALL_SKID_DB + DRY_SKID_SHARE * PACE_DB, WALL_SKID_S))
    tick_db = WALL_BLOW_DB + TICK_DB - CUSHION_SHARE * np.maximum(PACE_DB - 2.5, 0)
    high = body(WALL_MODES, WALL_CYCLES, rub, blows(tick_db, 0.00285, count=6), spot_db=WALL_SPOT_DB,
                tint_db=lambda hz: -14.0 * np.minimum(np.abs(np.log2(hz / STRIKE_HZ[last])), 1.1))
    rattle = slip * skids(AIR_BLOW_DB + RATTLE_DB + RATTLE_PACE_SHARE * PACE_DB, RATTLE_S)
    high = high + body(AIR_MODES[6:] + WALL_MODES[:6], RATTLE_CYCLES, rattle, 0, spot_db=WALL_SPOT_DB,
                       tint_db=lambda hz: -4.0 * np.log2(hz / 1000))
    high = high + plops(STRIKE_S + PLOP_RISE_CYCLES / STRIKE_HZ, undb(WALL_BLOW_DB + SMACK_DB), STRIKE_HZ)
    plop_s, plop_db, plop_hz = np.transpose(CLEAR_PLOPS)
    high = high + plops(plop_s, undb(plop_db), plop_hz)
    high = high + undb(BUBBLE_DB) * drag_level * bubbles()
    return high_pass(low_pass(high, 7900.0), 420.0, order=2)


def splashes():
    """Fizz noise whose bands flare separately, so its colour keeps changing."""
    rest, out = unit(colour(rng.standard_normal(N), FIZZ_SPECTRUM)), 0
    for hz in FIZZ_BAND_EDGES_HZ:
        band = low_pass(rest, hz, order=4)
        out = out + band * undb(SPLASH_DB * walk(SPLASHES_PER_S))
        rest = high_pass(rest, hz, order=4)
    return out + rest * undb(SPLASH_DB * walk(SPLASHES_PER_S))


def batter_fizz(slip, drag_level):
    """Batter films burst round the wires: fine crackle following the slips, as mid and side."""
    dragged = undb(FIZZ_DRAG_DB + BRISK_DB) * (drag_level / undb(BRISK_DB)) ** FIZZ_GROWTH
    # slow wires and dull knocks on the rim fizz less
    strike_db = WALL_BLOW_DB + FIZZ_STRIKE_DB + WET_SHARE * PACE_DB
    strike_db = strike_db + BRIGHT_FIZZ_DB * np.log2(STRIKE_HZ / 2200)
    activity = signal.lfilter([.01], [1, -.99], np.abs(slip))
    burst = (dragged + skids(strike_db, FIZZ_BURST_S)) * activity * undb(2.0 * walk(90))
    return undb(15.5) * burst * splashes(), undb(20.0) * burst * high_pass(splashes(), 8500.0)


def whisk():
    """Counter, bowl air, wall and batter fizz answer the same slips and strikes."""
    wall_drag, air_drag, counter_drag = drag()
    slip = slips(per_s=6000., scatter_db=2.0)
    return (counter_top(slip, counter_drag), bowl_air(slip, air_drag),
            bowl_wall(slip, wall_drag), *batter_fizz(slip, wall_drag))


def kitchen(x, wide):
    """Tiles and cupboards return a short wash of decaying noise, partly different left and right."""
    t = np.arange(SR // 2) / SR
    tail = rng.standard_normal((2, len(t))) * (t > .003)
    dull = signal.lfilter([.12], [1, -.88], tail) * np.exp(-np.log(1000) * t / DULL_T60_S)
    bright = .5 * signal.lfilter([.4], [1, -.6], tail) * np.exp(-np.log(1000) * t / BRIGHT_T60_S)
    mid, side = signal.oaconvolve([x, wide], dull + bright, axes=1)[:, :N]
    return undb(-38.0) * mid, undb(-47.0) * high_pass(side, 300.0, order=2)


def scene():
    """Sum whisk, kitchen wash and hum as mid and side, then left and right."""
    counter, air, wall, fizz, fizz_side = whisk()
    # the air note goes into the wash mostly in the middle, little to the sides
    wash, wash_side = kitchen(counter + 0.87 * air + 1.4 * wall + fizz,
                              0.61 * counter + 0.15 * air + 1.68 * wall)
    still, still_side = hum()
    mid = counter + air + wall + fizz + wash + still
    side = fizz_side + wash_side + still_side
    return np.array([mid + side, mid - side])


def record(dry):
    """Gain control ducks after loud blows; peaks flatten; the top is cut."""
    over = np.maximum(np.abs(dry).mean(axis=0) - .2, 0)
    loud = signal.lfilter([1 / 6000], [1, 1 / 6000 - 1], over)  # 6000 samples
    ducked = dry / (1 + 60. * loud)
    flat = .84 * np.tanh((np.abs(ducked) / .84) ** 3) ** (1 / 3) * np.sign(ducked)
    return signal.sosfilt(signal.ellip(8, .2, 70, TOP_HZ, fs=SR, output="sos"), flat)


dry = scene()
out = record(dry)
put_to_file(out)
```